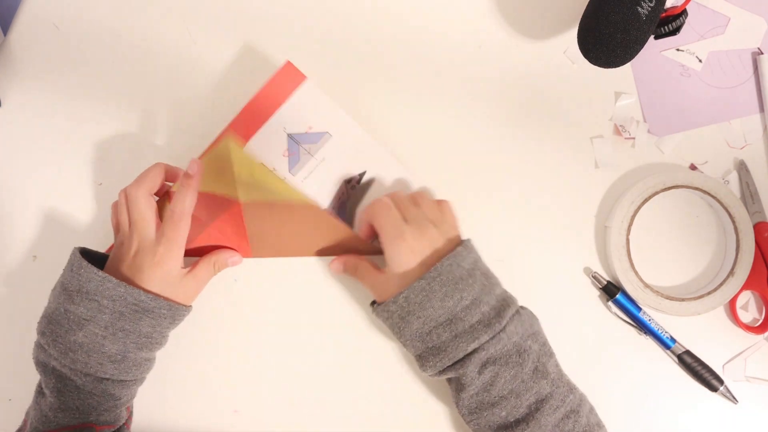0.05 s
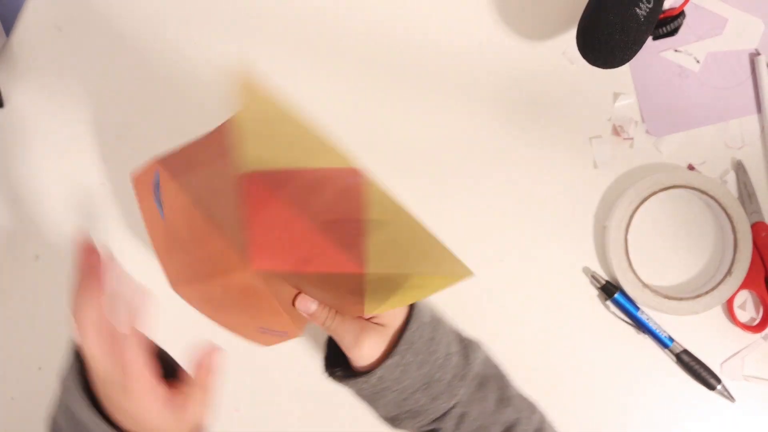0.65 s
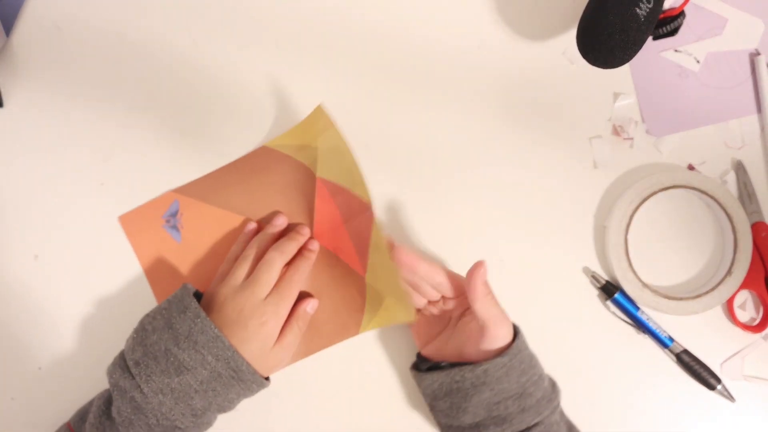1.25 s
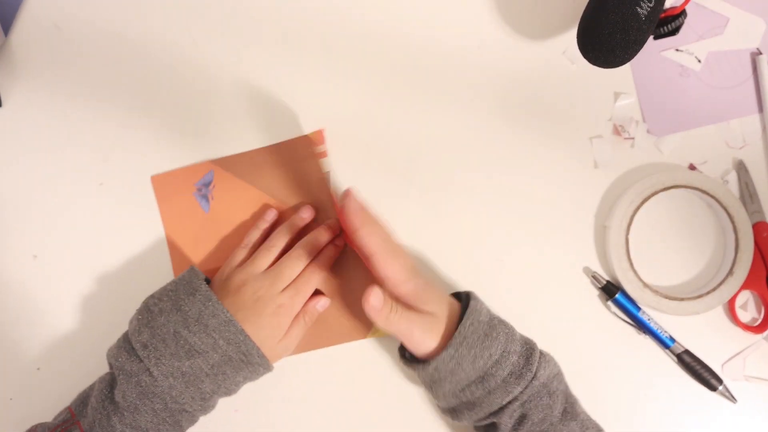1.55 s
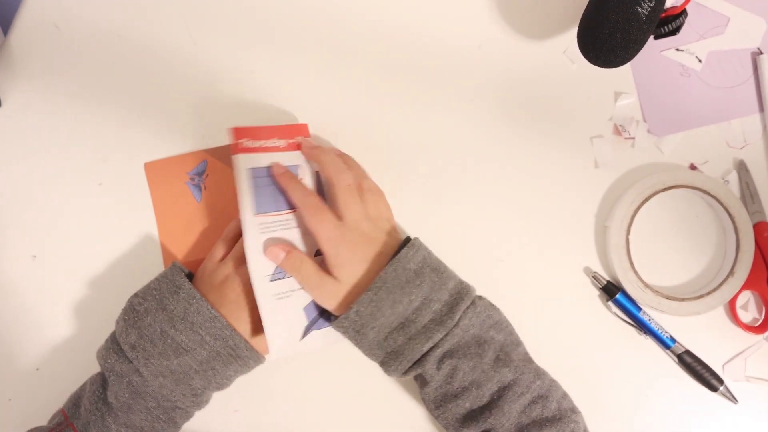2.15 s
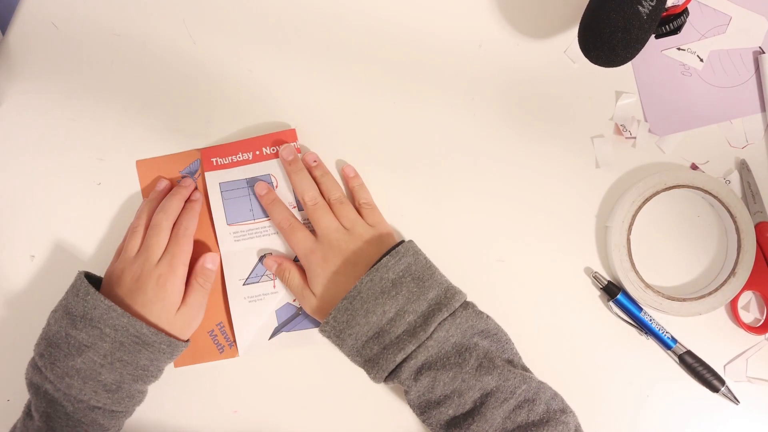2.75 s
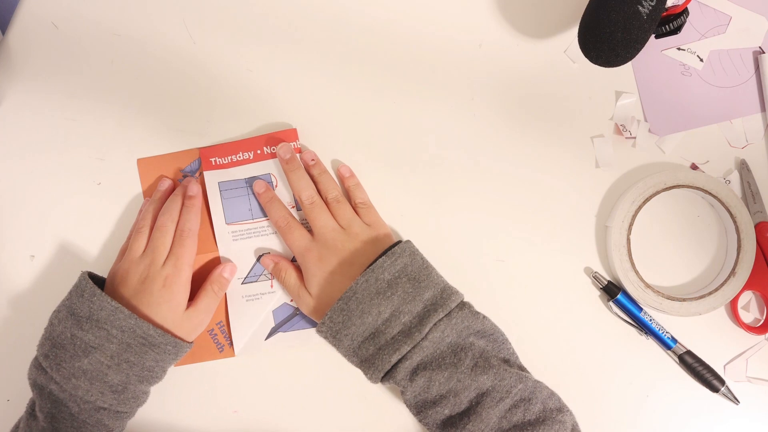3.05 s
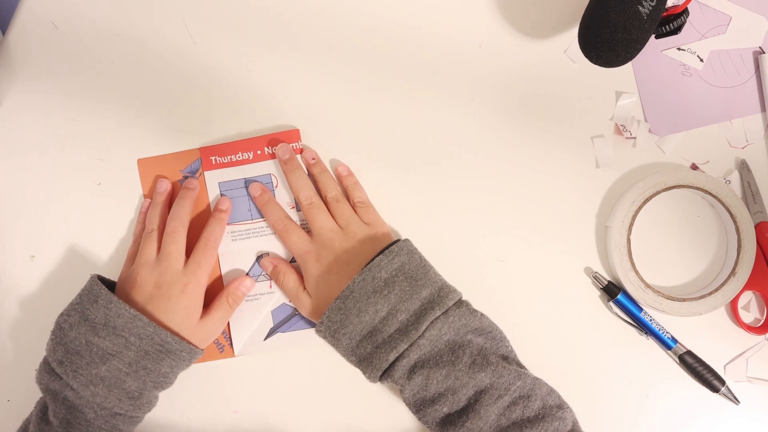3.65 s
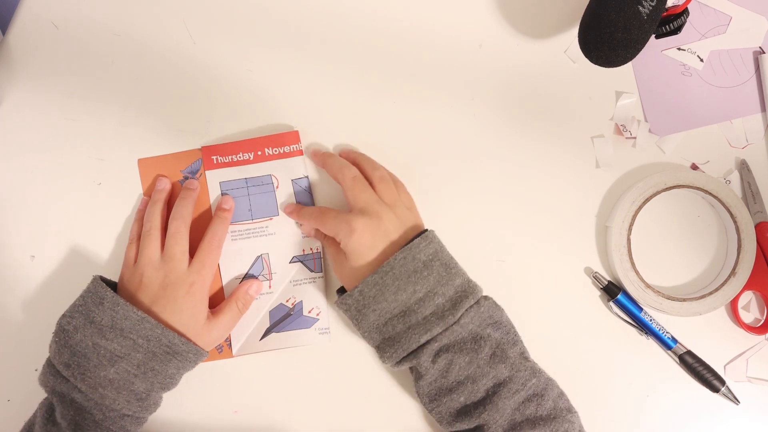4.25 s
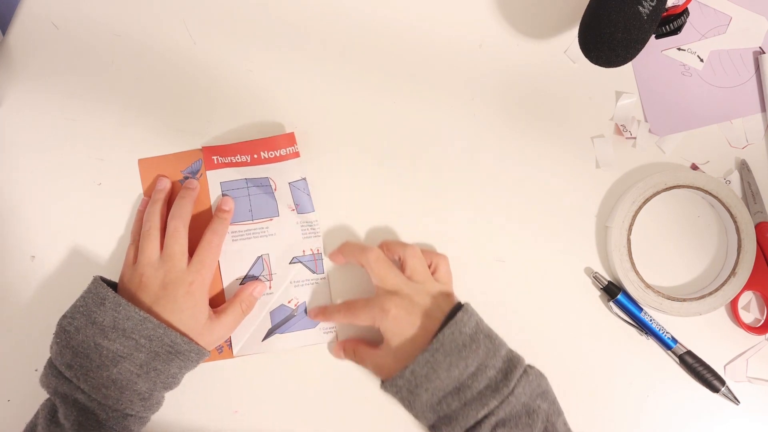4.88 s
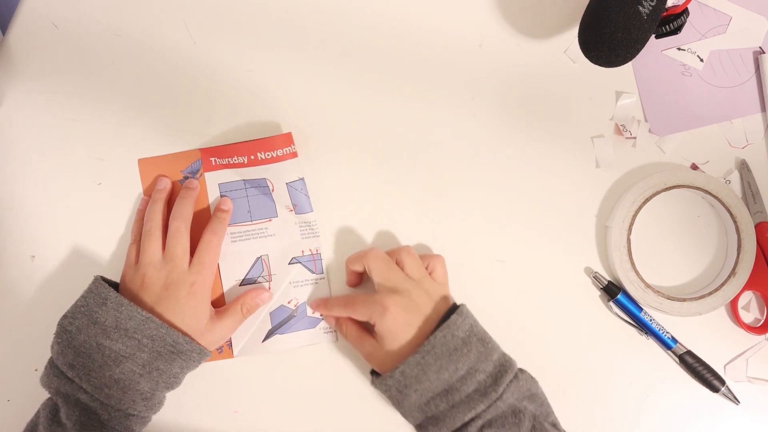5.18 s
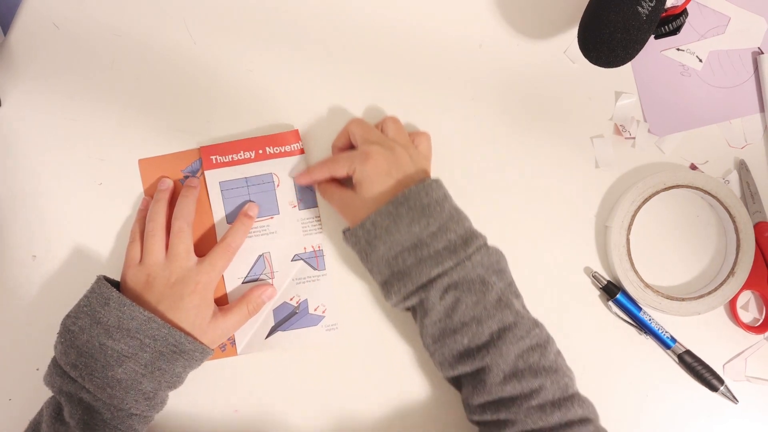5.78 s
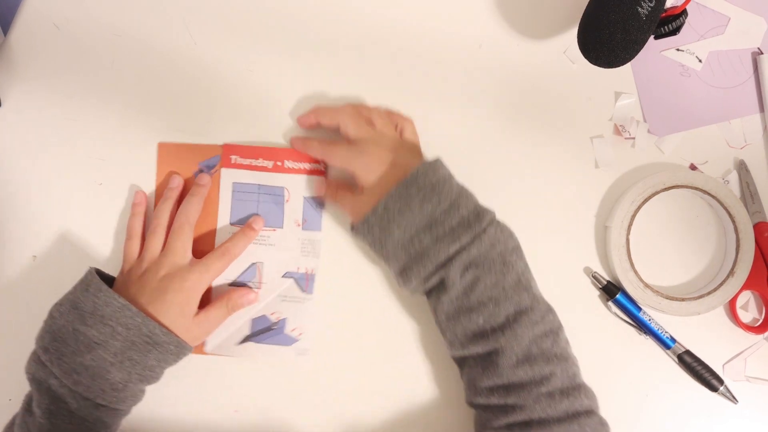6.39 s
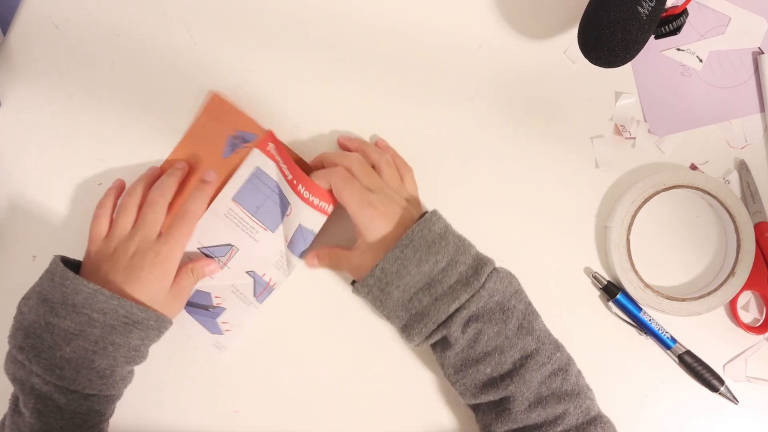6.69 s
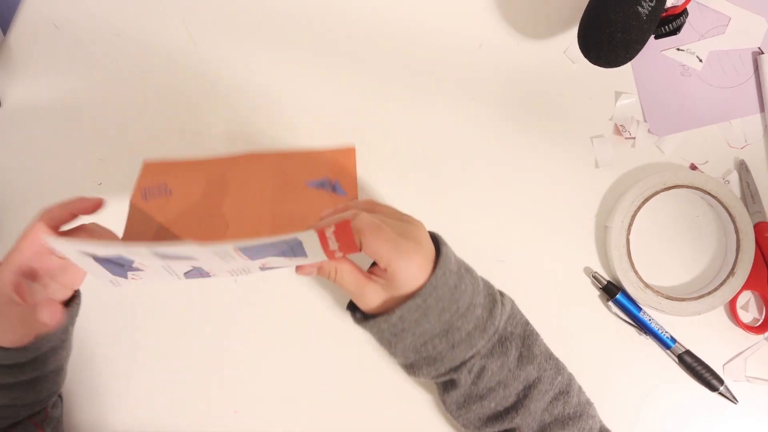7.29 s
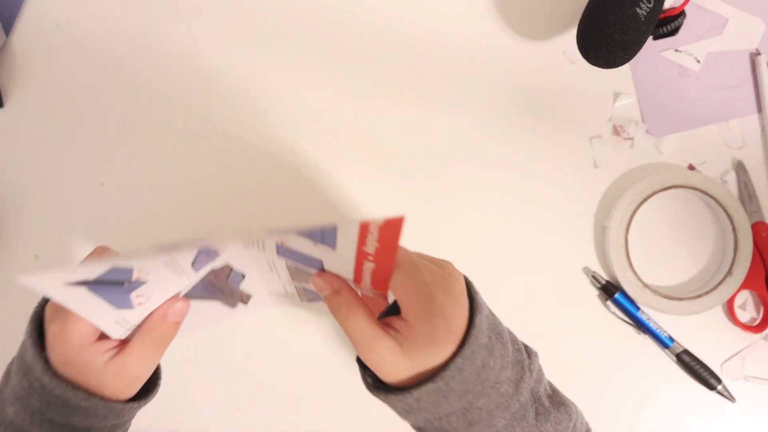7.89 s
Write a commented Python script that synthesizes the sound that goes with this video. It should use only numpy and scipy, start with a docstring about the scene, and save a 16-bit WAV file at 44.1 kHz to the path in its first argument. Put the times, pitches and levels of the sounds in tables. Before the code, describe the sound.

A sheet of paper is flipped and laid on a desk with crisp snaps, hissing slides and soft puffs of air. The handling grows quieter, then a fingertip scrapes down the crease and back, pressing a low rumble from the desk. The sheet crackles and rustles again as it is turned and lifted. A close microphone picks this up in a small quiet room.

```python
"""A desk in a small quiet room, one close microphone: two hands fold a sheet of origami paper.
The sheet is flipped, slid and laid flat, a fingertip runs down and up the crease, then the sheet is
turned and lifted. Sliding paper hisses, bending paper rustles and snaps, pressure makes the desk
rumble, and the moving sheet fans the air."""
import sys
import numpy as np
from scipy import signal
from scipy.fft import rfft, irfft
from scipy.io import wavfile

SR = 44100
rng = np.random.default_rng(int(sys.argv[2]) if len(sys.argv) > 2 else 0)


def log_audio(samples):
    """Write samples as a 16-bit WAV file to the path given in sys.argv[1]."""
    # one column per channel
    frames = np.atleast_2d(samples).T
    # limit to full scale, then quantise
    limited = np.clip(frames, -1, 1)
    pcm = np.round(limited * 32767).astype(np.int16)
    wavfile.write(sys.argv[1], SR, pcm)


N = 354123
TIME = np.arange(N) / SR

# sheet buckles, slaps down or is tapped: t/s, decay/ms, panel ring/Hz, panel/dB, crack/dB, knock/dB
SNAPS = [(0.049, 3.7, 3130, -44.5, -41.5, -44), (.447, 2.4, 640, -28.5, -36, -40),
         (0.468, 10.3, 2770, -27, -26.5, -45), (.51, 5.6, 930, -27.5, -48, -33),
         (.585, 6.5, 1050, -29.5, -57, -43), (0.827, 1.7, 1830, -34.5, -52, -42),
         (.9, 7.4, 753, -36, -43, -52), (.938, 11, 764, -37.5, -38, -53),
         (1.012, 4.6, 2950, -25.5, -23, -37), (1.041, 5.1, 1410, -27.5, -28, -32),
         (1.045, 1.6, 1420, -22, -16, -26), (1.187, 5.4, 3550, -20.5, -19.5, -29.5),
         (1.391, 4.7, 480, -38.5, -50, -40), (1.555, 3.1, 1160, -26.5, -42, -28),
         (1.728, 3.5, 480, -29.5, -59, -34.5), (2.038, 7.5, 796, -30, -50, -35.5),
         (2.061, 6.8, 1850, -36, -54, -33), (2.257, 4.7, 510, -38, -62, -35),
         (2.279, 4.8, 2020, -20.5, -21.5, -31), (2.778, 3.1, 2540, -37, -58, -53),
         (2.8, 3.9, 1060, -27, -34, -45), (3.007, 3.2, 1560, -49.5, -47.5, -66),
         (3.047, 2.9, 3300, -48, -42.5, -68), (3.558, 5, 530, -61, -55, -60),
         (3.855, 13, 2930, -45.5, -43, -59), (4.071, 1.9, 3560, -48, -42, -63),
         (4.212, 5.8, 480, -40.5, -42, -36), (4.47, 13, 785, -42, -57, -48),
         (4.618, 2.6, 500, -42, -57, -40), (4.805, 3.3, 1060, -31, -32, -54),
         (4.961, 11, 2470, -40, -42.5, -67), (5.216, 5, 1490, -40.5, -53, -44),
         (5.471, 3, 500, -43, -55, -39.5), (6.198, 3.5, 1220, -25, -28.5, -30.5),
         (6.724, 2.8, 3520, -37, -27.5, -43), (6.733, 3.3, 3400, -52, -33, -46),
         (6.742, 2.3, 3480, -34, -20, -45), (6.75, 5.4, 3550, -37, -32.5, -32.5),
         (6.822, 4.5, 3620, -43, -30.5, -52), (6.912, 4.3, 3230, -44, -28.5, -41.5),
         (7.093, 6.9, 603, -40, -44, -43), (7.157, 9.4, 1570, -38, -41, -49),
         (7.206, 7.4, 2730, -21.5, -28, -44), (7.502, 2.6, 580, -35, -52, -39),
         (7.731, 2.2, 1820, -22.5, -35.5, -37), (7.836, 4.2, 690, -29.5, -43, -32),
         (7.874, 3.5, 1850, -35.5, -68, -60), (7.907, 6, 1080, -43, -61, -44.5)]
# air hollow under the sheet: f/Hz, width/Hz, level/dB
HOLLOW_MODES = [(543, 70, 9), (782, 110, 2), (1575, 83, -3)]
# holds that let the hollow ring: t/s, length/s, level/dB re rustle, growth/dB
HOLLOW_HOLDS = [(0, 1.2, -7, -14), (7.09, 0.29, -3.5, 0), (7.37, 0.86, 3.5, -9)]


def from_db(db):
    return 10 ** (np.asarray(db) / 20)


def power_db(power):
    return 10 * np.log10(power + 1e-20)


def unit_rms(x):
    return x / np.sqrt(np.mean(x ** 2) + 1e-20)


def per_sample(rows):
    """Columns of a (t/s, ...) table, interpolated to every sample."""
    times_s, *columns = np.transpose(rows)
    return [np.interp(TIME, times_s, column) for column in columns]


def add(track, start_s, sound):
    start = int(start_s * SR)
    track[start:start + len(sound)] += sound[:N - start]


def convolve(x, impulse):
    return signal.oaconvolve(x, impulse)[:len(x)]


def coloured(x, spectrum, size=4096):
    """Minimum-phase filter from (f/Hz, level/dB) points; falls 10 dB/octave beyond them."""
    hz, db = np.transpose(spectrum)
    grid_hz = np.maximum(np.arange(size // 2 + 1) * SR / size, 1)
    outside_oct = np.log2(np.maximum(hz[0] / grid_hz, 1) * np.maximum(grid_hz / hz[-1], 1))
    gain_db = np.interp(np.log(grid_hz), np.log(hz), db) - 10 * outside_oct
    cepstrum = irfft(np.log(from_db(gain_db)))
    cepstrum[1:size // 2] *= 2
    cepstrum[size // 2 + 1:] = 0
    return convolve(x, irfft(np.exp(rfft(cepstrum))))


def resonator(hz, width_hz):
    """Two-pole band-pass coefficients, peak gain 1."""
    r = np.exp(-np.pi * width_hz / SR)
    return (1 - r * r) / 2 * np.array([1, 0, -1]), [1, -2 * r * np.cos(2 * np.pi * hz / SR), r * r]


def ringing(x, modes):
    """Parallel resonances, signs alternating."""
    return sum((-1) ** k * from_db(db) * signal.lfilter(*resonator(hz, width_hz), x)
               for k, (hz, width_hz, db) in enumerate(modes))


def gliding(x, hz, width_hz, block=256):
    """Resonance whose centre follows a curve; rms 1."""
    out, state = np.zeros(N), np.zeros(2)
    for i in range(0, N, block):
        out[i:i + block], state = signal.lfilter(*resonator(hz[i], width_hz), x[i:i + block], zi=state)
    return unit_rms(out)


def drift(rate_hz):
    """Random wander; rms 1."""
    knots = rng.standard_normal(N // 20)
    return unit_rms(np.interp(TIME * rate_hz, np.arange(len(knots)), knots))


def grains(per_s, spread_db, hiss):
    """Fibres catch and let go: uneven clicks over smooth hiss; rms 1."""
    sizes = from_db(spread_db * np.minimum(rng.exponential(1, N), 4)) * rng.choice([-1, 1], N)
    clicks = unit_rms(sizes * (rng.random(N) < per_s / SR))
    return unit_rms(clicks + hiss * rng.standard_normal(N))


def move(start_s, length_s, db, growth_db, margin=9000):
    """Power of one hand move: sets in, is fastest midway, dies away; tilted by growth_db."""
    attack_s, release_s, arch_db = 0.012, 0.015, 4.5
    near = slice(max(int(start_s * SR) - margin, 0), int((start_s + length_s) * SR) + margin)
    t = TIME[near] - start_s
    from_middle = np.clip(t / length_s, 0, 1) - 0.5
    hold = from_db(db + growth_db * from_middle - arch_db * (2 * from_middle) ** 2)
    edges = np.exp(-np.maximum(-t, 0) / attack_s - np.maximum(t - length_s, 0) / release_s)
    power = np.zeros(N)
    power[near] = (hold * edges) ** 2
    return power


def moves(rows):
    return sum(move(*row) for row in rows)


def ring_share(holds, loose_db=-23):
    """Ring gain of a part of the sheet: high while held, loose_db otherwise."""
    return np.sqrt(from_db(loose_db) ** 2 + moves(holds))


def room_tone(level_db=-63.5):
    """Faint, steady, dull noise."""
    # f/Hz, density/dB
    spectrum = [(25, 10), (86, 11.5), (183, 0), (260, 2), (340, -22), (700, 8), (1340, 0.5), (2170, 4),
                (3090, -1.5), (3930, -9), (5430, -12), (9810, -60), (15500, -32)]
    return from_db(level_db) * unit_rms(coloured(rng.standard_normal(N), spectrum))


def room(x, t60_s=0.3, tail_db=-24, onset_s=0.0051, treble_hz=6500):
    """Direct sound plus a short diffuse tail that has lost its treble."""
    t = np.arange(16000) / SR
    tail = rng.standard_normal(len(t)) * from_db(-60 * t / t60_s) * (1 - np.exp(-t / onset_s))
    tail *= from_db(tail_db) / np.linalg.norm(tail)
    return x + convolve(x, signal.lfilter(*signal.butter(1, treble_hz, fs=SR), tail))


def air_puffs(band_hz=(30, 115)):
    """The swinging sheet fans slow waves of air at the microphone."""
    # t/s, half length/s, level/dB
    puffs = [(0.468, 0.026, -37.5), (.53, 0.049, -47), (0.946, .01, -33.5), (1.034, 0.032, -39),
             (1.196, 0.054, -40.5), (1.563, 0.0074, -31), (2.076, 0.016, -40.5), (7.213, 0.011, -39.5),
             (7.582, 0.02, -47.5)]
    out = np.zeros(N)
    air = signal.sosfilt(signal.butter(2, band_hz, "band", fs=SR, output="sos"), rng.standard_normal(N))
    for centre_s, half_s, db in puffs:
        swell = np.exp(-0.5 * np.minimum(((TIME - centre_s) / half_s) ** 2, 100))
        out += from_db(db) * air * swell * np.linalg.norm(swell) / np.linalg.norm(air * swell)
    return out


def desk_rumble(level_db):
    """Fingers stick and slip on the paper and shake the desk under it."""
    # f/Hz, density/dB
    spectrum = [(20, -2.5), (55, -8.5), (105, -0.5), (200, -4), (260, 2), (320, -7), (400, -4),
                (600, -10.5), (1200, -32.5)]
    slips = grains(per_s=600, spread_db=3.5, hiss=0.93)
    return from_db(level_db) * unit_rms(coloured(slips, spectrum))


def bending_rustle(level_db):
    """Tiny buckles shake the sheet; resonances wander as it bends, stand out when creased or cupped."""
    # f/Hz, density/dB
    spectrum = [(200, -14.5), (400, -2.5), (600, 1), (760, 1.5), (900, -0.5), (1100, 3), (1800, 1.5),
                (2400, -2.5), (3200, -7.5), (4200, -46.5)]
    # folded flap and its far corner: f/Hz, width/Hz, level/dB
    flap_modes = [(1000, 48, -1), (1313, 24, -6.5), (1850, 44, -7.5)]
    corner_modes = [(731, 36, -3.5), (825, 16, -2.5), (1030, 57, -17)]
    # holds that let them ring: t/s, length/s, level/dB re rustle, growth/dB
    flap_holds = [(4.48, 0.7, -0.5, 6), (5.33, 0.59, 3.5, 6)]
    corner_holds = [(4.48, 0.22, -3, -9), (5.55, 0.67, 2, 3)]
    buckles = grains(per_s=1200, spread_db=4.0, hiss=0.77)
    wandering = sum(gliding(buckles, hz * 2 ** (0.182 * drift(2.9)), width_hz=12)
                    for hz in (680, 1150, 1750))
    rustle = unit_rms(unit_rms(coloured(buckles, spectrum)) + 0.088 * unit_rms(wandering))
    power = 1
    parts = (flap_holds, flap_modes), (corner_holds, corner_modes), (HOLLOW_HOLDS, HOLLOW_MODES)
    for holds, modes in parts:
        share = ring_share(holds)
        rustle += share * unit_rms(ringing(rng.standard_normal(N), modes))
        power += share ** 2
    rustle /= np.sqrt(power)   # the rings take their energy from the rustle
    return rustle * from_db(level_db + 1.94 * drift(70))


def sliding_hiss(level_db, top_db):
    """Paper slides over paper and desk; the grip flutters, light fast contact adds the top octave."""
    # friction and its top octave: f/Hz, density/dB
    body_spectrum = [(900, -17), (2200, -1), (3000, 3.5), (3450, 4.5), (3900, -1), (4700, 1.5), (5700, 4),
                     (6500, 1.5), (7500, -3), (10000, -6.5)]
    top_spectrum = [(4500, -8.5), (7500, -4), (9000, -0.5), (10300, -1), (12000, -6), (14000, -7),
                    (16000, -13.5)]
    catches = 0.19 * grains(per_s=80, spread_db=-2.5, hiss=0)   # an edge catches, in all bands at once
    slips = grains(per_s=4500, spread_db=-2.5, hiss=1.0) + catches
    fine_slips = grains(per_s=6000, spread_db=1.5, hiss=0.56) + catches
    body = unit_rms(coloured(slips, body_spectrum))
    top = from_db(top_db) * unit_rms(coloured(fine_slips, top_spectrum))
    return (body + top) * from_db(level_db + 1.24 * drift(110))


def quivers(decay_s=0.033, re_panel_db=-20, re_knock_db=-13):
    """Each snap leaves the sheet quivering: power of the dying rustle and rumble."""
    bend, desk = np.zeros(N), np.zeros(N)
    dying = np.exp(-np.arange(SR) / SR / decay_s)
    for start_s, _, _, panel_db, _, knock_db in SNAPS:
        add(bend, start_s, (from_db(panel_db + re_panel_db) * dying) ** 2)
        add(desk, start_s, (from_db(knock_db + re_knock_db) * dying) ** 2)
    return bend, desk


def pause_gain(stop_s=0.0073):
    """Handling noise drops while the hands rest."""
    # t/s, length/s, drop/dB
    pauses = [(.582, 0.246, 0.5), (1.128, 0.045, 0.5), (1.272, 0.06, 5.5), (2.64, 0.046, 3),
              (2.969, 0.073, 8), (3.93, 0.086, 8), (4.396, 0.068, 8.5), (5.091, 0.077, 5.5),
              (5.235, 0.1, 1), (6.246, 0.07, 1.5), (7.544, 0.15, 5.5)]
    step = lambda at_s: 0.5 * np.tanh((TIME - at_s) / stop_s)
    return from_db(-sum(db * (step(at_s) - step(at_s + length_s)) for at_s, length_s, db in pauses))


def handling():
    """Hand moves, light touch and quivers set the power of hiss, rustle and desk rumble."""
    # light touch between moves: t/s, level/dB
    touch = [(0.0, -49), (0.98, -49), (1.38, -44), (2.35, -47), (3.33, -66.5), (3.8, -62.5), (4.85, -47),
             (5.05, -50), (5.77, -57), (6.28, -54), (6.6, -53), (7.42, -53.5), (7.56, -58.5), (8.03, -58)]
    # sheet slides on paper, skin or desk: t/s, length/s, level/dB, growth/dB, top octave/dB re level
    slides = [(0.108, 0.071, -40, 7, -8.5), (0.216, 0.073, -42.5, -1, -2.5), (0.411, 0.021, -38.5, 0, -3.5),
              (0.317, 0.08, -55, 0, 7.5), (0.465, 0.094, -32, 0.5, 4), (0.567, .016, -36, -17, 6.5),
              (0.894, 0.23, -43, -0.5, 3), (1.191, 0.084, -40, -11, -12), (1.342, 0.21, -36.5, 4.5, -7.5),
              (1.565, 0.2, -45, -18, -17), (1.852, 0.048, -45, 7, -1.5), (1.964, 0.16, -44.5, -13, 2),
              (2.354, 0.23, -47.5, -12.5, -2), (2.588, 0.03, -37.5, -1, -11), (2.72, 0.096, -50.5, 3, -17),
              (2.913, 0.03, -50.5, -1, -7), (3.046, 0.014, -46, -13, -15), (3.118, 0.13, -57.5, 0, -24),
              (3.313, 0.017, -57, 0, -15), (3.872, 0.056, -63, 4, -15), (4.106, .27, -49, -4, -5.5),
              (4.533, 0.38, -46.5, 12.5, -6.5), (4.952, 0.065, -58, -8, -9), (5.18, 0.14, -60, 2, 7),
              (5.33, 0.83, -48.5, -4.5, -1.5), (6.363, 0.31, -49.5, 1, -0.5), (6.72, 0.25, -47.5, -2, 1),
              (7.056, 0.038, -49.5, -2, 7.5), (7.133, .11, -42, 1, 1), (7.324, 0.19, -51, -11, 4.5),
              (7.454, 0.096, -42.5, 11, 4.5), (7.821, 0.01, -43.5, -11, -6)]
    # sheet is bent: t/s, length/s, level/dB, growth/dB
    bends = [(.13, 0.22, -49, -15), (.41, .115, -38.5, 4), (.585, 0.4, -49, -20), (.915, 0.14, -41, 15),
             (1.89, 0.22, -47, -3), (2.588, 0.019, -37, 3), (3.86, 0.046, -59, 16),
             (4.48, 0.65, -48.5, 6.5), (5.33, 0.91, -49.5, -2.5), (6.96, 0.21, -56, -15),
             (7.155, 0.15, -47, -8), (7.38, 0.3, -51, 0), (7.822, 0.14, -46, -20), (8.0, 0.044, -49.5, -12)]
    # fingers press and rub on the desk: t/s, length/s, level/dB, growth/dB
    presses = [(.15, 0.23, -51.5, -22), (.445, 0.2, -46, -3), (.92, 0.11, -46, -5), (1.86, 0.085, -51, 12),
               (3.1, .17, -60.5, 0), (3.7, 0.3, -59.5, 15), (4.02, 0.78, -63, -18), (4.49, 0.68, -52.5, -4),
               (5.135, 0.042, -43.5, -15), (5.44, 0.742, -45, 10.5), (6.34, 0.59, -61, -18),
               (6.76, 0.069, -52, 6), (6.955, 0.092, -46.5, -4), (7.375, 0.24, -56.5, -8)]
    touch_hiss_db, touch_top_db, touch_bend_db = -3.5, -6.5, -6
    drag_bend_db, drag_desk_db = -14, -19   # a slide also bends the sheet and shakes the desk
    resting_hands_db = -61.5
    touch_db, = per_sample(touch)
    sliding, top = 0, from_db(touch_db + touch_top_db) ** 2
    for *slide, top_db in slides:
        power = move(*slide)
        sliding += power
        top += power * from_db(top_db) ** 2
    bend_quiver, desk_quiver = quivers()
    friction = sliding + from_db(touch_db + touch_hiss_db) ** 2
    bend = moves(bends) + bend_quiver + sliding * from_db(drag_bend_db) ** 2
    bend += from_db(touch_db + touch_bend_db) ** 2
    desk = moves(presses) + desk_quiver + sliding * from_db(drag_desk_db) ** 2
    desk += from_db(resting_hands_db) ** 2
    hiss = sliding_hiss(power_db(friction), power_db(top / friction))
    return pause_gain() * (hiss + bending_rustle(power_db(bend)) + desk_rumble(power_db(desk)))


def creasing(width_hz=1700, overtone_ratio=1.74, overtone_db=-9.5):
    """The strip beside the fingertip rings lower as it runs down the fold, higher on the way back."""
    # fingertip strokes: t/s, strip ring/Hz, level/dB
    down = [(4.46, 3130, -62), (4.75, 2720, -49), (4.955, 2380, -73), (4.962, 2490, -37.5),
            (5.03, 2350, -43.5), (5.08, 2200, -76)]
    up = [(5.28, 2300, -83), (5.4, 2500, -64), (5.65, 2870, -53), (5.86, 3500, -48), (5.92, 5100, -48),
          (6.04, 6100, -50), (6.18, 6200, -74)]
    strip_hz, level_db = per_sample(down + up)
    scrape = grains(per_s=3400, spread_db=2.0, hiss=0.85)
    strip = gliding(gliding(scrape, strip_hz, width_hz), strip_hz, width_hz)
    overtone_hz = overtone_ratio * strip_hz
    overtone = gliding(gliding(scrape, overtone_hz, 2 * width_hz), overtone_hz, 2 * width_hz)
    touching = (TIME > down[0][0]) & (TIME < up[-1][0])
    return from_db(level_db) * (strip + from_db(overtone_db) * overtone) * touching


def avalanche(t, decay_ms, first_slip):
    """One sharp slip sets off a dying shower of smaller ones; long showers swell first."""
    t_ms = t * 1000
    swell = 1 - np.exp(-t_ms / (0.0026 * decay_ms ** 2))
    shower = rng.standard_normal(len(t)) * swell * np.exp(-t_ms / decay_ms)
    shower /= np.linalg.norm(shower)
    shower[0] = first_slip / decay_ms
    return shower


def desk_knock(t, spread_db=3.1, detune=0.13):
    """A blow rings the desk's modes, each time a little differently; rms 1."""
    # f/Hz, level/dB, t60/s
    modes = [(106, -11, 0.046), (174, 5.5, 0.011), (247.5, -1, 0.061), (440, -5.5, 0.027)]
    knock = np.zeros(len(t))
    for k, (hz, db, t60_s) in enumerate(modes):
        envelope = from_db(db + spread_db * rng.standard_normal() - 60 * t / t60_s)
        detuned_hz = hz * (1 + detune * rng.standard_normal())
        knock += (-1) ** k * envelope * np.sin(2 * np.pi * detuned_hz * t)
    return unit_rms(knock)


def snaps():
    """Each snap: a bright crack, the ring of the bent panel, a knock on the desk."""
    # f/Hz, density/dB
    crack_spectrum = [(1500, -26.5), (3000, 2), (3500, 6), (4000, 1), (5600, 4), (7500, -3.5), (10000, -5),
                      (13000, -9.5), (16000, -19)]
    panel_spectrum = [(200, -0.5), (450, -4), (600, 2), (850, 2), (1200, 2), (2000, 1.5), (3200, -1),
                      (4000, -7), (6500, -30)]
    # bent panel: multiple of its ring, width/Hz, level/dB
    partials = [(1, 121, 33), (1.8, 216, -9)]
    out, t = np.zeros(N), np.arange(6000) / SR
    for start_s, decay_ms, ring_hz, panel_db, crack_db, knock_db in SNAPS:
        crack = coloured(avalanche(t, 1.26 * decay_ms, first_slip=2.7), crack_spectrum)
        # a broad, soft buckle cracks duller than a tight one
        edge_hz = np.clip(11000 * from_db(0.12 * (crack_db - panel_db)), 4000, 18000)
        crack = unit_rms(signal.lfilter(*signal.butter(2, edge_hz, fs=SR), crack))
        buckle = coloured(avalanche(t, 1.7 * decay_ms, first_slip=3.1), panel_spectrum)
        modes = [(ratio * ring_hz, width_hz, db) for ratio, width_hz, db in partials]
        panel = unit_rms(unit_rms(buckle) + 0.5 * unit_rms(ringing(buckle, modes)))
        snap = from_db(crack_db) * crack + from_db(panel_db) * panel + from_db(knock_db) * desk_knock(t)
        add(out, start_s, snap * np.sqrt(decay_ms / 1000 / t[-1]))   # levels: energy per decay time
    return out


def cupped(x, ring_db=-5):
    """Air under the lifted sheet rings along with the snaps."""
    return x + from_db(ring_db) * ring_share(HOLLOW_HOLDS) * ringing(x, HOLLOW_MODES)


def scene():
    """One microphone feeds both channels."""
    paper = handling() + creasing() + cupped(snaps())
    background = room_tone()
    return np.tile(room(paper) + air_puffs() + background, (2, 1))


def record(dry, cutoff_hz=15900):
    """Steep low-pass."""
    return signal.sosfilt(signal.ellip(12, 0.1, 80, cutoff_hz, fs=SR, output="sos"), dry)


dry = scene()
out = record(dry)
log_audio(out)
```